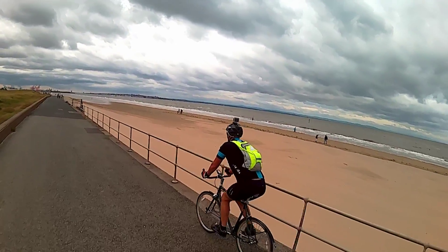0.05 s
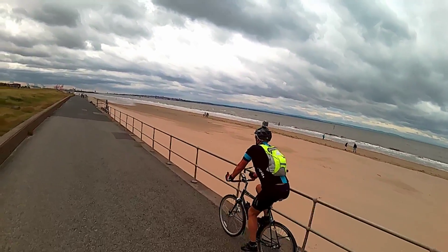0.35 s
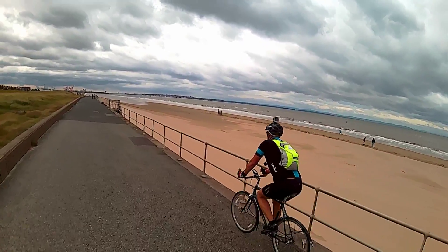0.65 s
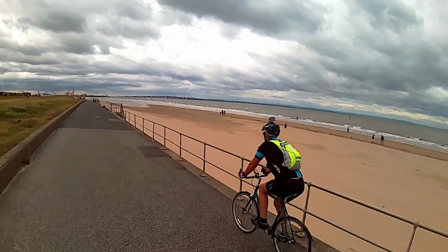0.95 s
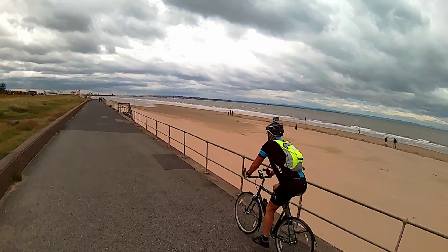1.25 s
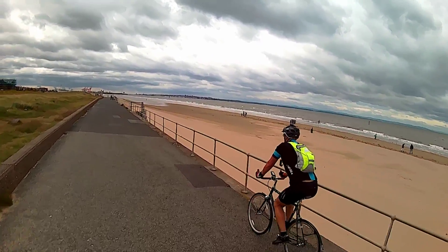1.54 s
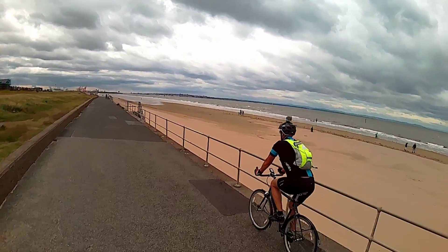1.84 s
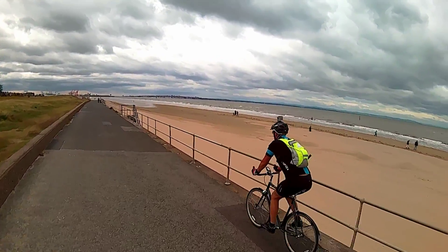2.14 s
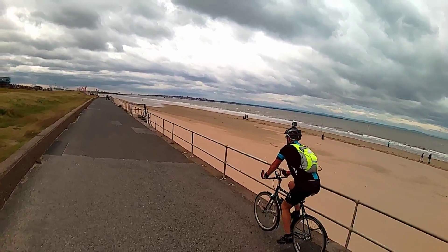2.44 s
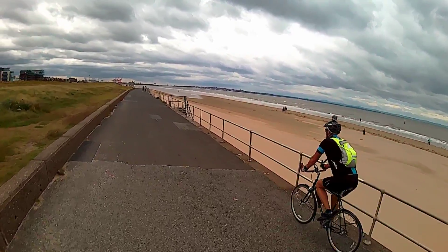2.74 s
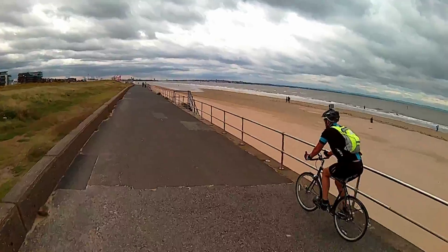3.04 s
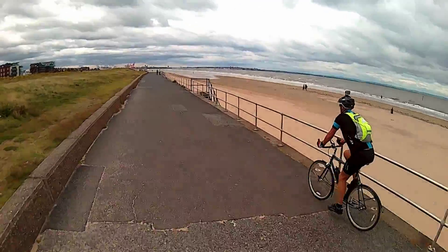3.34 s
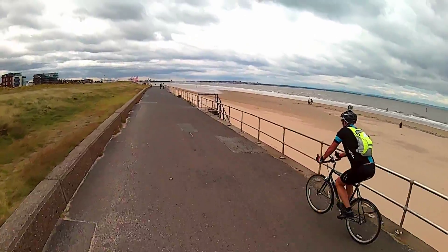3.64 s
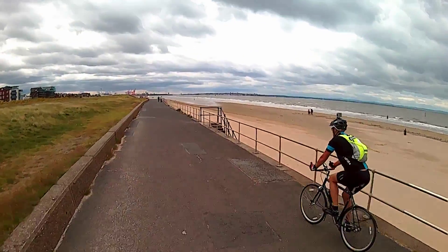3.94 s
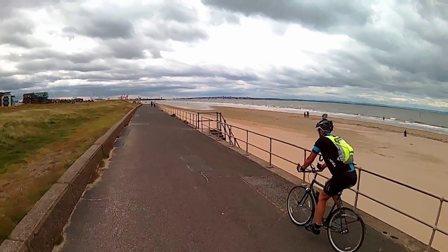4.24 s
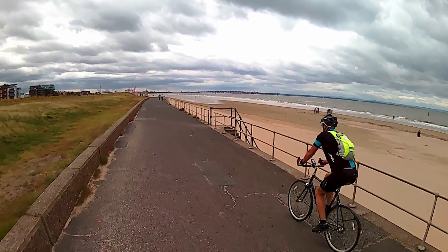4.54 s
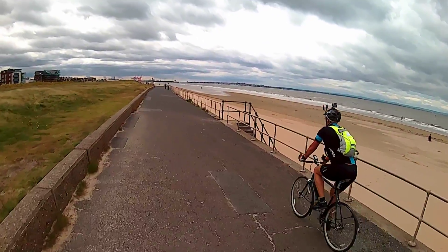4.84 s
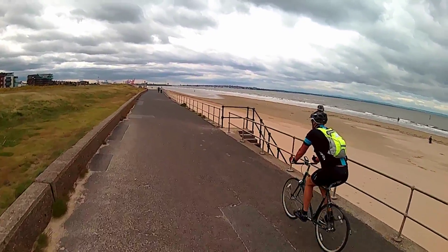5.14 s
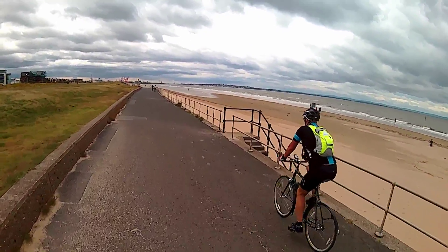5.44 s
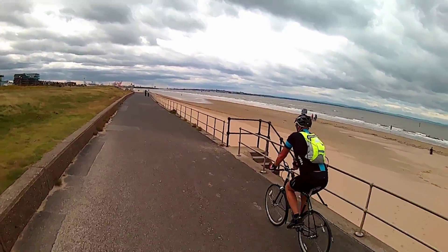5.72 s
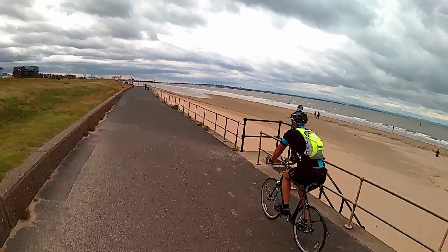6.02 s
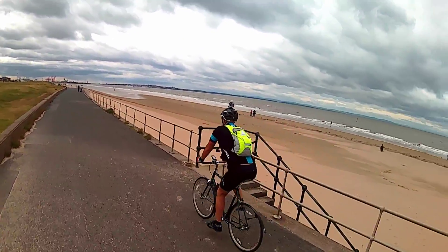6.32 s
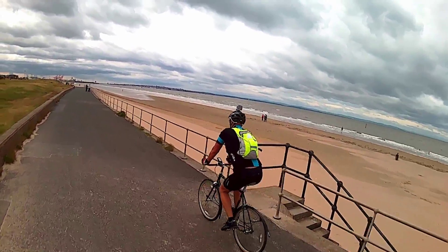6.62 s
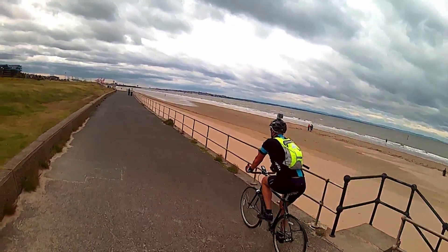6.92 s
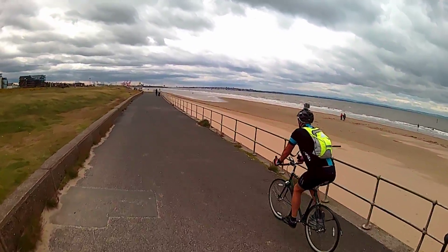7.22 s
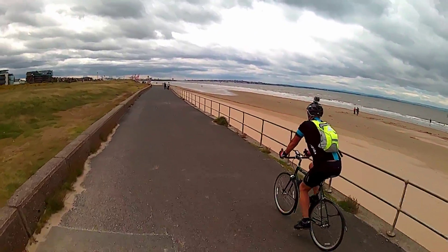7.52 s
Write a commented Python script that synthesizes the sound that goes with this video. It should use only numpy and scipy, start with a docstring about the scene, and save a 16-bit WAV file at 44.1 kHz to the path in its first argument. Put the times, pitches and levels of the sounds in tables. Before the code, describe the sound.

Wind hits the microphone of a small camera on a bicycle moving along an open seafront. It makes a loud, close, low rumble with uneven buffeting and a softer rush of air behind it. The sound has little treble, and the hardest peaks distort and crackle. For the first 2 seconds or so the rumble is strong, with brief rough flutters and a few blunt thumps. From about 2.5 to 5.3 seconds it eases somewhat, and the rush comes forward between surges. A cluster of air thumps and heavy buffets arrives around 5.5 to 5.8 seconds, followed by a short hiss near 6 seconds. The wind builds to a strong, fluttering, hissing gust at about 6.7 seconds. Another puff of hiss comes near 7 seconds and a thump at 7.3, with the rumble a little lower until the end at about 7.7 seconds.

```python
"""Wind right on the microphone of a small camera, out in the open on a bicycle riding along a seafront.
Big eddies buffet the microphone, smaller ones rumble at its port, and shed vortices flutter briefly.
Behind them, just as close, the headwind rushes and hisses over the case.
The summed pressure overloads the input: peaks flatten, crackle, and choke the hiss while they last."""
import sys
import numpy as np
from scipy import signal
from scipy.fft import rfft, irfft
from scipy.io import wavfile
from scipy.ndimage import uniform_filter1d

SR = 44100
rng = np.random.default_rng(int(sys.argv[2]) if len(sys.argv) > 2 else 0)


def int16_out(signal):
    """Quantize to a 16-bit WAV file."""
    q = np.round(np.clip(np.atleast_2d(signal).T, -1, 1) * 32767)
    wavfile.write(sys.argv[1], SR, q.astype(np.int16))


N = 338247

# Turbulence at the microphone, finest eddies first. Each row: frequency in Hz, relative density in dB.
HISS_SPECTRUM = [(400, -18), (1000, 1.5), (1600, 3.5), (2300, -0.5), (3000, -8), (3800, -9.5)]
RUSH_SPECTRUM = [(60, -18.5), (250, -4.5), (500, 0), (800, 1), (1100, -2), (1500, -9.5), (2200, -18),
                 (3800, -25)]
FLUTTER_SPECTRUM = [(60, -24), (150, 0.5), (230, 0.5), (350, -8), (600, -14), (1200, -27), (4000, -53.5)]
RUMBLE_SPECTRUM = [(20, -13.5), (55, -5), (100, -1), (170, -5.5), (280, -13.5), (500, -25), (1500, -61),
                   (4000, -70)]
BUFFET_SPECTRUM = [(3, -14), (10, -12), (22, 2), (45, -5), (80, -12), (200, -32), (1000, -74)]
# The smoother stream over the case. Each row: time in seconds, level of the rush in dB.
STREAM_LEVELS = [(0.0, -14.5), (0.45, -19.3), (0.65, -18), (1.1, -20.5), (1.6, -18.5), (2.15, -19),
                 (2.9, -15), (3.3, -16), (3.8, -14.5), (4.1, -17.5), (4.4, -16.5), (4.75, -19.5),
                 (4.98, -16.5), (5.25, -19), (6.15, -18), (6.37, -18.5), (6.9, -19), (7.67, -15)]
# Flurries that brighten the stream. Each row: peak time in seconds, length in seconds, hiss rise in dB.
STREAM_FLURRIES = [(0.23, 0.074, 8), (0.535, 0.27, 4.5), (1.96, 0.16, 5), (2.70, 0.28, 7), (2.98, .12, 3.5),
                   (4.47, 0.25, 3), (5.957, 0.12, 9), (6.71, 0.15, 17.5), (7.062, 0.23, 11), (7.5, 0.31, 3)]
# Regular trains of shed vortices.
# Each row: start in seconds, end in seconds, starting pitch in Hz, final pitch in Hz, level in dB.
VORTEX_TRAINS = [(0.196, 0.346, 250, 305.5, -5.5), (0.738, 0.933, 189.2, 163.6, -3.5),
                 (1.323, 1.485, 140, 119.2, -3.5), (6.224, 6.326, 115.2, 133.8, -0.5),
                 (6.43, 6.472, 133.8, 122.7, 2), (6.613, 6.691, 171, 306.6, 6.5),
                 (6.693, 6.744, 258.9, 226.4, 6), (6.903, 7.00, 221.6, 191.6, -5.5)]
# Shoves of air that pin the microphone. Each row: middle in seconds, length in seconds, pressure in dB.
AIR_SHOVES = [(0.346, 0.01, 7), (0.570, 0.013, 7.5), (0.684, 0.013, 5.5), (1.203, 0.025, 4),
              (1.522, 0.0095, 3), (2.178, 0.0085, 11), (4.916, 0.011, 7.5), (5.505, 0.0086, 9),
              (5.518, 0.032, 5), (5.536, 0.01, 15), (5.570, 0.0085, 9), (5.585, 0.01, 11),
              (5.802, 0.031, 0), (5.820, 0.012, 9.5), (6.764, 0.017, 4.5), (6.793, 0.006, 5.5),
              (7.341, 0.0075, 14)]
# The gusty flow at the microphone port. Each row: time in seconds, level of the rumble in dB.
GUST_LEVELS = [(0.0, -2), (0.25, -3.5), (0.58, -8.5), (0.8, -3.5), (1.45, -3.5), (1.68, -8), (2.2, -5),
               (2.45, -8.9), (3.5, -10), (4.1, -13), (4.85, -10), (5.15, -13.5), (5.7, -7.5), (6.08, -7.5),
               (6.27, -3), (6.7, -2.1), (6.86, -7), (7.67, -11)]
# Heavy surges of buffeting. Each row: peak time in seconds, length in seconds, rise in dB.
BUFFET_SURGES = [(0.60, 0.064, 4.5), (1.18, 0.17, 4), (1.54, .14, 2), (2.12, 0.3, 4.5), (2.76, 0.35, 5),
                 (3.53, 0.21, 4), (4.0, 0.11, 5.5), (4.82, 0.14, 6), (5.52, .16, 7.5), (5.78, 0.093, 9.5),
                 (6.22, 0.2, 3), (6.71, 0.11, 9)]


def from_db(db):
    """Decibels to gain."""
    return 10 ** (np.asarray(db) / 20)


def level_curve(rows):
    """A table of levels in dB, joined by straight lines at every sample."""
    times, db = np.transpose(rows)
    return np.interp(np.arange(N) / SR, times, db)


def swells(rows):
    """Bell-shaped rises in dB, one for each row."""
    t = np.arange(N) / SR
    return sum(db * np.exp(-np.square(2 * (t - peak) / length)) for peak, length, db in rows)


def wander(rate_hz):
    """A smooth random drift with spread 1."""
    drift = signal.sosfilt(signal.butter(2, rate_hz, fs=SR, output="sos"), rng.standard_normal(N))
    return drift / drift.std()


def flicker(rate_hz, depth_db):
    """A gain that wanders quickly about 1."""
    gain = from_db(depth_db * wander(rate_hz))
    return gain / np.sqrt(np.mean(gain ** 2))


def turbulence(spectrum, window_samples=3500):
    """Random pressure with the given spectrum, held near rms 1 over about a tenth of a second."""
    hz, db = np.transpose(spectrum)
    log_hz = np.log(np.maximum(np.fft.rfftfreq(N, 1 / SR), 1))
    colour = from_db(np.interp(log_hz, np.log(hz), db))
    pressure = irfft(rfft(rng.standard_normal(N)) * colour, N)
    power = uniform_filter1d(uniform_filter1d(pressure ** 2, window_samples), window_samples)
    return pressure / np.sqrt(power)


def stream_over_case(hiss_base_db=-31.5, hiss_follows=1.15, rush_flurry_share=0.32):
    """Fine turbulence on the camera case: a bed of rush and hiss in quick, uneven puffs."""
    stream_db, flurry_db = level_curve(STREAM_LEVELS), swells(STREAM_FLURRIES)
    hiss_db = hiss_base_db + hiss_follows * (stream_db - stream_db.mean()) + flurry_db
    rush = from_db(stream_db + rush_flurry_share * flurry_db) * turbulence(RUSH_SPECTRUM)
    hiss = from_db(hiss_db) * turbulence(HISS_SPECTRUM)
    return (rush + hiss) * flicker(rate_hz=23, depth_db=1.0)


def shed_vortices(jitter=0.2, build_s=0.036, break_s=0.0016):
    """Vortices peel off in a train: a rough, gliding flutter that builds, then breaks off at once."""
    t, trains = np.arange(N) / SR, np.zeros(N)
    unevenness = 1 + jitter * wander(rate_hz=130)
    for start, end, start_hz, end_hz, db in VORTEX_TRAINS:
        hz = np.interp(t, [start, end], [start_hz, end_hz]) * unevenness
        envelope = np.clip(np.minimum((t - start) / build_s, (end - t) / break_s), 0, 1)
        trains += from_db(db) * envelope * np.sin(2 * np.pi * np.cumsum(hz) / SR)
    return trains * flicker(rate_hz=97, depth_db=0.5)


def air_shoves():
    """Flat-topped lumps of pressure that push and pull on the microphone in turn."""
    t = np.arange(N) / SR
    return sum((-1) ** k * from_db(db) * np.exp(-(2 * (t - middle) / length) ** 4)
               for k, (middle, length, db) in enumerate(AIR_SHOVES))


def wind_on_microphone(buffet_base_db=-8, buffet_follows=0.63, lurch_db=1.5, flutter_share=0.83):
    """Eddies buffet and rumble right at the port; a harder gust sheds smaller ones that flutter."""
    gust_db = level_curve(GUST_LEVELS)
    gust = from_db(gust_db)
    buffet_db = buffet_base_db + buffet_follows * (gust_db - gust_db.mean())
    buffet_db += swells(BUFFET_SURGES) + lurch_db * wander(rate_hz=5)
    flutter = flutter_share * np.minimum(gust, 1.2) * turbulence(FLUTTER_SPECTRUM)
    flutter *= flicker(rate_hz=45, depth_db=4.0)   # it comes in flaps
    buffet = from_db(buffet_db) * turbulence(BUFFET_SPECTRUM)
    rumble = turbulence(RUMBLE_SPECTRUM)
    return buffet + gust * (rumble + flutter)


def input_limiter(pressure, follow_hz=1300, knee=0.566, headroom=0.13):
    """A very fast limiter holds big swells just under full scale and lets small ripples ride on them."""
    pole = np.exp(-2 * np.pi * follow_hz / SR)
    swing = signal.filtfilt([1 - pole], [1, -pole], np.abs(pressure)) + 1e-9
    excess = np.maximum(swing - knee, 0)
    held_swing = swing - excess + headroom * np.tanh(excess / headroom)
    return pressure * held_swing / swing


def input_clipper(pressure, full_scale=0.707, corner_width=0.0045):
    """The input clips with a slightly rounded corner, so that near misses rasp faintly too."""
    overshoot = corner_width * np.logaddexp(0, (np.abs(pressure) - full_scale) / corner_width)
    return pressure - np.sign(pressure) * overshoot


def scene():
    """All the air pressure at the one microphone, in mono."""
    return (wind_on_microphone() + stream_over_case() + air_shoves() + shed_vortices())[None]


def record(dry, port_hz=3760, droop_hz=1.5, cutoff_hz=16500):
    """The camera's input is limited and passes little treble; what still overshoots clips and crackles."""
    limited = input_limiter(dry)
    dulled = signal.sosfilt(signal.butter(24, port_hz, fs=SR, output="sos"), limited)
    # Flat tops start high and sag.
    sagging = signal.sosfilt(signal.butter(1, droop_hz, "high", fs=SR, output="sos"), dulled)
    clipped = input_clipper(sagging)
    return signal.sosfilt(signal.ellip(10, .1, 70, cutoff_hz, fs=SR, output="sos"), clipped)


dry = scene()
out = record(dry)
int16_out(out)
```